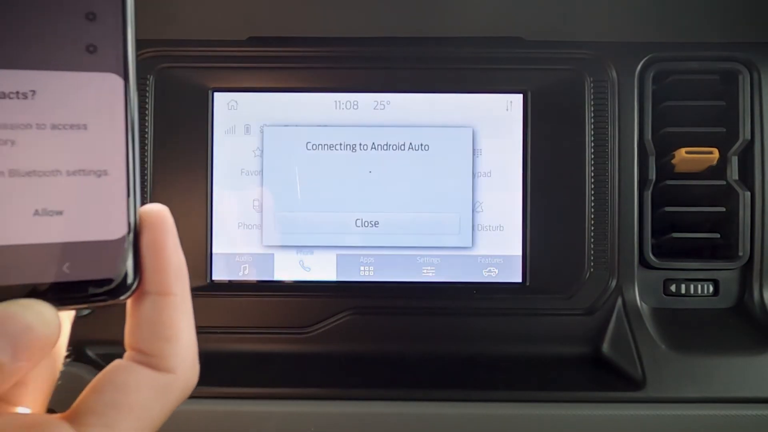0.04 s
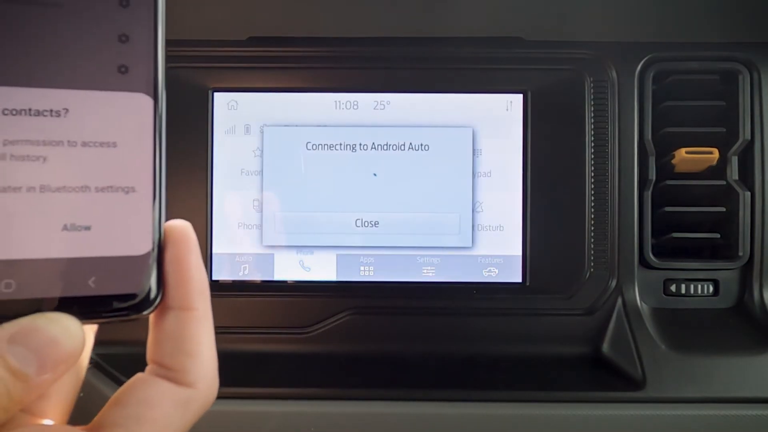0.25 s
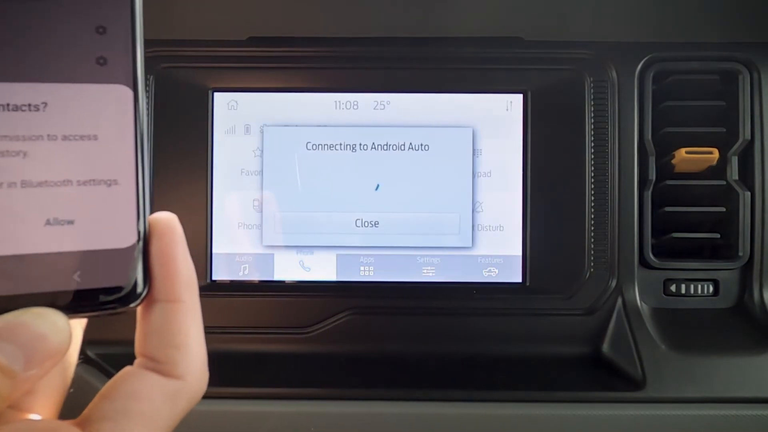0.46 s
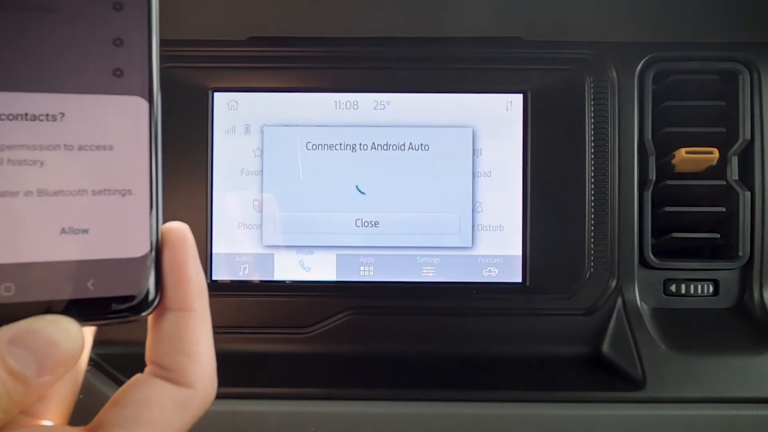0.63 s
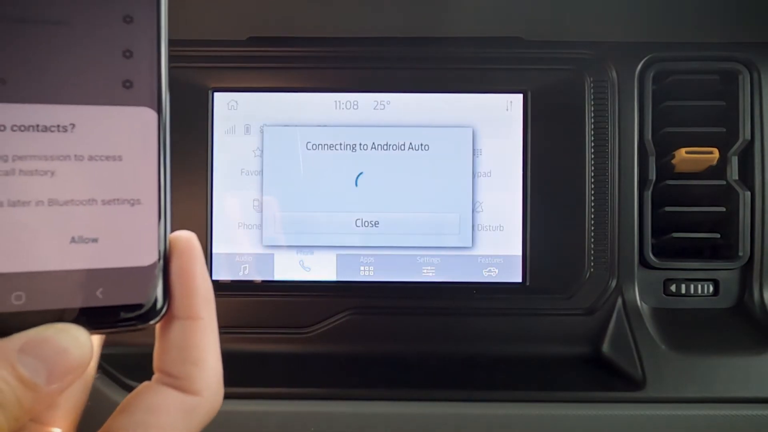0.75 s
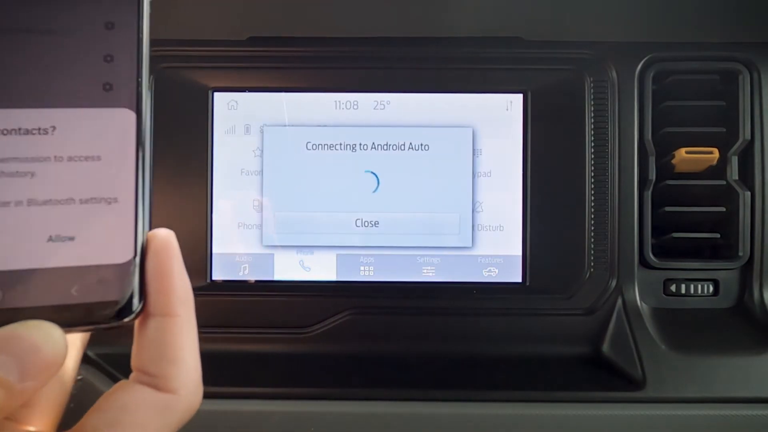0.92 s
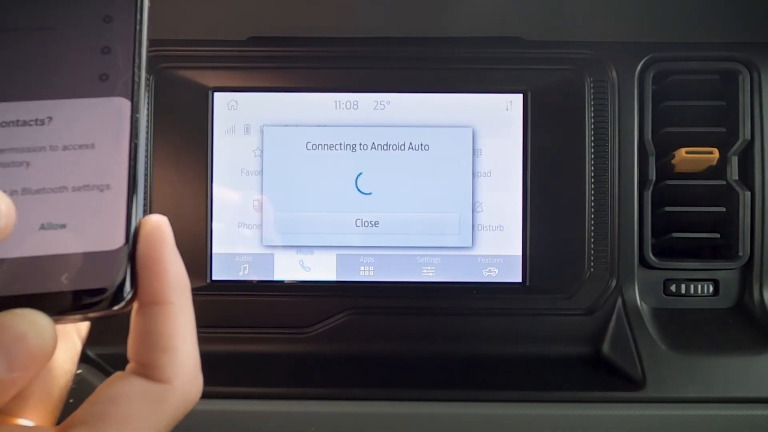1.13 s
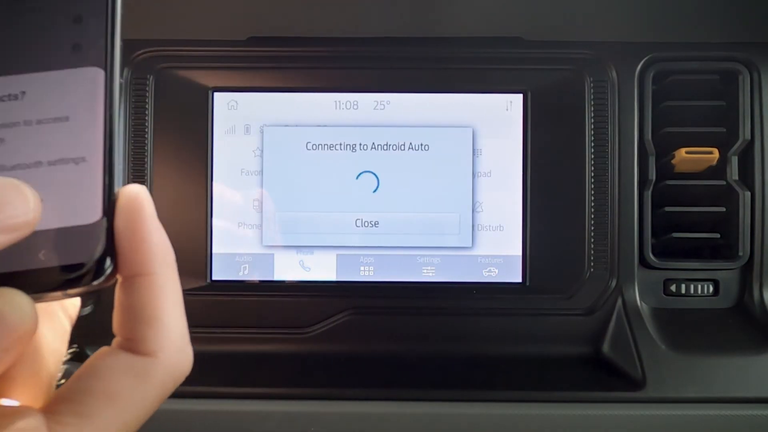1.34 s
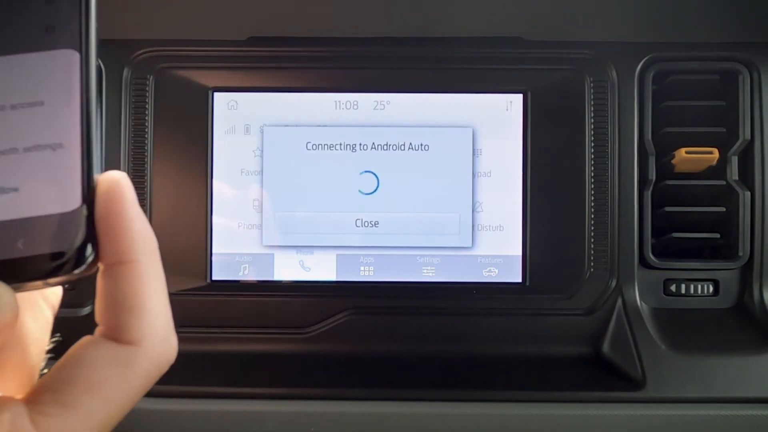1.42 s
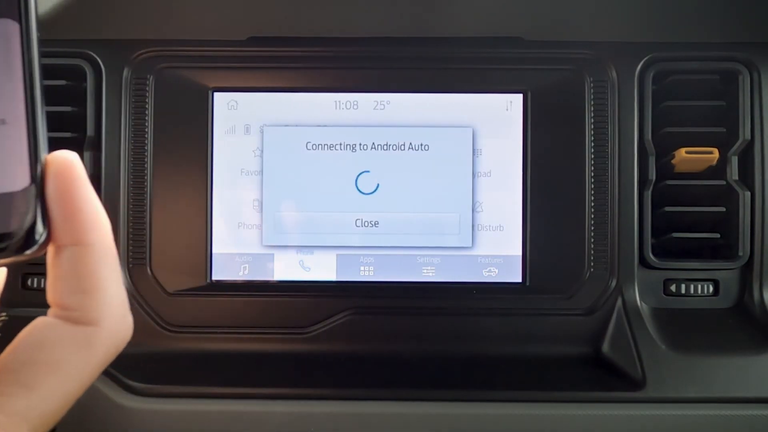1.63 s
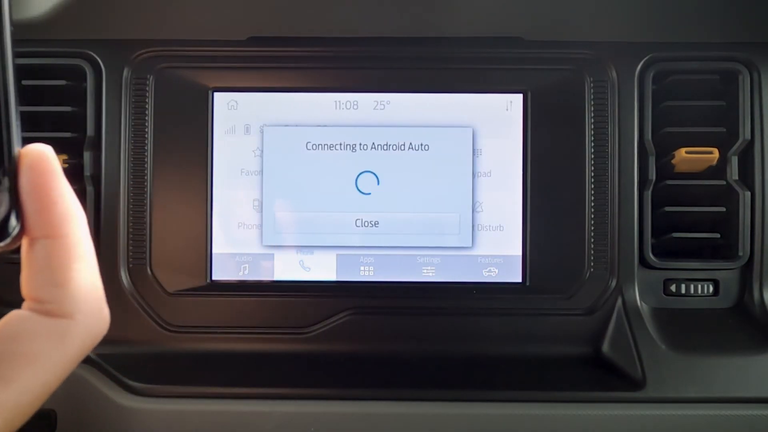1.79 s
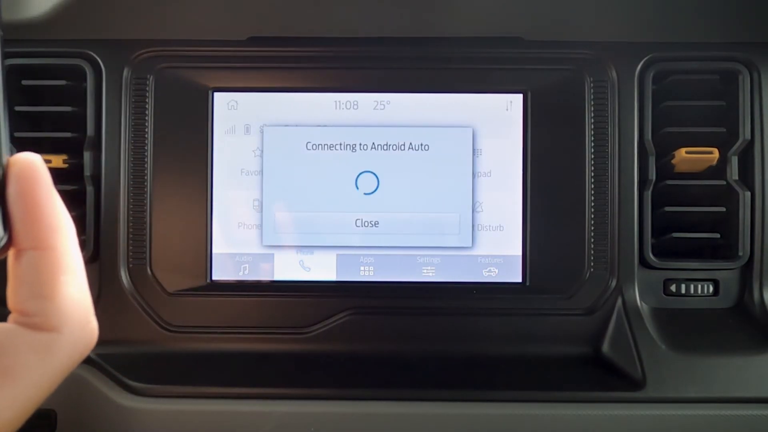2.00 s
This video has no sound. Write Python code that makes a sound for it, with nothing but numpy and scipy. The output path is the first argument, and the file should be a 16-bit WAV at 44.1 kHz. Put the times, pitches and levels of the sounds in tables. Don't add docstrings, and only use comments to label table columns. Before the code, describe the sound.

Low idling engine rumble heard inside a stationary car, with soft finger rubs on a phone case

```python
import sys
import numpy as np
from scipy import signal
from scipy.fft import rfft, irfft, next_fast_len
from scipy.io import wavfile

SR = 44100
rng = np.random.default_rng(int(sys.argv[2]) if len(sys.argv) > 2 else 0)


def transcribe(signal):
    frames = np.atleast_2d(signal).T
    limited = np.clip(frames, -1, 1)
    pcm = np.round(limited * 32767).astype(np.int16)
    wavfile.write(sys.argv[1], SR, pcm)


def voltage_ratio(decibels):
    exponent = np.asarray(decibels, float) / 20
    return 10 ** exponent


N = 90581
TIME_S = np.arange(N) / SR


def at_hz(points, hz):
    p = np.array(points, float)
    return np.interp(np.log(hz), np.log(p[:, 0]), p[:, 1])


def coloured(gain):
    size = next_fast_len(N)
    hz = np.arange(1, size // 2 + 2) * SR / size
    x = irfft(rfft(rng.standard_normal(size)) * gain(hz), size)[:N]
    return x / x.std()


def drift(rate_hz):
    return coloured(lambda hz: 1 / (1 + (hz / rate_hz) ** 2))


def shaped(points):
    low_hz, high_hz = points[0][0], points[-1][0]
    return coloured(lambda hz: voltage_ratio(at_hz(points, hz)) / (1 + (low_hz / hz) ** 8 + (hz / high_hz) ** 8))


def resonance(centre_hz, width_hz):
    return coloured(lambda hz: 1 / (1 + ((hz - centre_hz) / width_hz * 1.48) ** 2))


# (frequency [Hz], density [dB per Hz])
HISS_SPECTRUM = [(1800, -0.5), (2390, -3.5), (4000, -7.5), (5410, -10), (6480, -12), (11900, -15),
                 (15800, -9.5)]
HISS_DB = -65.5


def hiss():
    return voltage_ratio(HISS_DB) * shaped(HISS_SPECTRUM)


# (frequency [Hz], density [dB per Hz])
RUMBLE_SPECTRUM = [(9, -14), (21, 0), (44, 2), (62, -4), (72, -11), (85, -12.5), (100, -18), (140, -16)]
RUMBLE_DB = -38.3


def rumble():
    return voltage_ratio(RUMBLE_DB) * shaped(RUMBLE_SPECTRUM)


# (frequency [Hz], density [dB per Hz])
AIR_SPECTRUM = [(150, -7), (220, -14), (304, -15), (400, -6), (480, -16.5), (1080, -17.5), (1620, -28),
                (2600, -43)]
AIR_DB, AIR_DRIFT_DB = -52, 0.61


def duct_air():
    return voltage_ratio(AIR_DB + AIR_DRIFT_DB * drift(4.6)) * shaped(AIR_SPECTRUM)


# (frequency [Hz], width [Hz], level [dB rms])
PANEL_RESONANCES = [(166, 36, -55.5), (279.3, 37, -57), (344.7, 31.6, -52.5), (366.1, 13, -52),
                    (380.8, 15, -60), (406.2, 9.3, -55), (436.5, 12.5, -54.5), (459.4, 21, -61.5),
                    (559.5, 47, -61), (746, 68, -64.5), (1076, 70, -65.5), (1794, 54, -80),
                    (2375, 110, -79.5), (2790, 30, -83)]
PANEL_DRIFT_DB = .6


def panels():
    out = np.zeros(N)
    for hz, width_hz, db in PANEL_RESONANCES:
        out += voltage_ratio(db + PANEL_DRIFT_DB * drift(6.0)) * resonance(hz, width_hz)
    return out


# (time [s], firing rate [Hz])
FIRING_RATE = [(0, 28.97), (1.0, 28.96), (1.5, 29.08), (2.06, 29.25)]
STRONG_FIRING_S = .0528


def firing_angle():
    rate_hz = np.interp(TIME_S, *np.transpose(FIRING_RATE))
    angle = 2 * np.pi * np.cumsum(rate_hz) / SR
    return angle - angle[int(STRONG_FIRING_S * SR)]


# (time [s], level [dB])
CHIRP_HIGH_LEVEL = [(0, -66), (.45, -66), (.85, -69.5), (1.1, -74), (1.3, -80), (1.6, -75), (2.06, -75)]
# (time [s], level [dB])
CHIRP_LOW_LEVEL = [(0, -80), (.45, -77), (.9, -72), (1.5, -71), (2.06, -72)]
# main belt, second belt [Hz]
CHIRP_PITCH = (5700, 5130)
CHIRP_LAG_S, CHIRP_SHARPNESS, CHIRP_UNEVEN_DB = .004, 1.7, 1.6


def pulley(angle):
    a = angle - 2 * np.pi * FIRING_RATE[0][1] * CHIRP_LAG_S
    torque = .75 * np.cos(a) + .19 * np.cos(a / 2) - .06 * np.cos(a / 4)
    gate = np.exp(CHIRP_SHARPNESS * (torque - 1))
    out = np.zeros(N)
    for hz, levels in zip(CHIRP_PITCH, (CHIRP_HIGH_LEVEL, CHIRP_LOW_LEVEL)):
        pitch_hz = hz - 45 * np.sin(a) - 35 * np.cos(a / 2) + 35 * drift(80.0)
        level_db = np.interp(TIME_S, *np.transpose(levels)) + CHIRP_UNEVEN_DB * drift(20.0)
        out += voltage_ratio(level_db) * gate * np.sin(2 * np.pi * np.cumsum(pitch_hz) / SR)
    return out


# (time [s], frequency [Hz], peak level [dB], t60 [s])
KNOCK_MODES = [
    (0, 262, -28, .07),
    (1.334, 1300, -49, .04),
    (1.334, 1750, -51, .035),
    (1.338, 2730, -59, .07),
]
KNOCK_RISE_S = .002


def knocks():
    out = np.zeros(N)
    for start_s, hz, db, t60_s in KNOCK_MODES:
        age_s = TIME_S - start_s
        decay = voltage_ratio(db - 60 * np.abs(age_s) / t60_s)
        already_ringing = start_s == 0
        onset = np.minimum(1, already_ringing + np.abs(age_s) / KNOCK_RISE_S)
        out -= (age_s >= 0) * decay * onset * np.cos(2 * np.pi * hz * age_s)
    return out


# (time [s], level [dB], frequency [Hz], width [Hz], t60 [s])
TICK_MODES = [
    (.003, -54, 6960, 970, 0.055),
    (.003, -55, 9800, 3200, .03),
    (.001, -65, 2700, 1600, 0.11),
    (.004, -48, 945, 150, 0.2),
    (.004, -52, 1290, 150, 0.25),
    (.004, -60, 1860, 1100, 0.12),
]
TICK_RISE_S = 0.00058


def ticks():
    out = np.zeros(N)
    for start_s, db, hz, width_hz, t60_s in TICK_MODES:
        age_s = np.maximum(TIME_S - start_s, 0)
        onset = np.minimum(age_s / TICK_RISE_S, 1)
        out += voltage_ratio(db - 60 * age_s / t60_s) * onset * resonance(hz, width_hz)
    return out


# (time [s], level [dB], lowest frequency [Hz])
NAIL_CLICK = (1.909, -31, 9000)


def click():
    start_s, db, low_hz = NAIL_CLICK
    first = int(start_s * SR)
    out = np.zeros(N)
    out[first] = voltage_ratio(db)
    out[first + 60] = -voltage_ratio(db - 5)
    return signal.sosfilt(signal.butter(4, low_hz, "high", fs=SR, output="sos"), out)


# (start [s], length [s], level [dB], centre [Hz], width [Hz])
RUB_TRAIL = (1.025, .23, -62, 11900, 1100)


def trail():
    start_s, length_s, db, hz, width_hz = RUB_TRAIL
    u = np.clip((TIME_S - start_s) / length_s, 0, 1)
    return voltage_ratio(db) * np.sin(np.pi * u ** 0.67) ** 2 * resonance(hz, width_hz)


# (start [s], length [s], level [dB], centre [Hz], rising share [0-1])
GRIP_RUBS = [(0.444, 0.19, -66, 12500, 0.34), (0.562, 0.093, -63, 12000, 0.37),
             (0.673, 0.068, -58.5, 13500, 0.26), (0.684, 0.068, -56, 14900, .5),
             (0.77, 0.03, -63.5, 12500, .4), (0.73, 0.49, -67, 12700, 0.48), (1.022, .18, -55, 13100, .12),
             (1.12, 0.15, -70.5, 12000, .4), (1.428, 0.12, -63, 12600, 0.33),
             (1.533, 0.076, -69, 13000, .4), (1.605, .17, -55.5, 13700, .25),
             (1.70, 0.081, -58.5, 13300, 0.67), (1.761, .13, -50.5, 13100, 0.16),
             (1.84, 0.2, -66.5, 12900, 0.25), (1.949, 0.11, -62.5, 12400, 0.41),
             (0.566, 0.076, -66, 4360, 0.45), (1.623, 0.13, -72, 4000, 0.43),
             (1.78, 0.42, -66.5, 3760, 0.33)]
# (frequency [Hz], level below its top [dB])
RUB_SKIRT_SPECTRUM = [(2000, -15), (3800, -6.5), (5500, -13), (7000, -5), (8500, -11.5), (15000, -7)]
RUB_WIDTH_OCT, RUB_GRAIN_DB = .44, .7


def rub_noise(centre_hz):
    def gain(hz):
        band = np.exp(-(np.log2(hz / centre_hz) / RUB_WIDTH_OCT) ** 2)
        skirt = voltage_ratio(at_hz(RUB_SKIRT_SPECTRUM, hz)) * (hz > 1500)
        return band + skirt
    return coloured(gain)


def rubs():
    out = np.zeros(N)
    for start_s, length_s, db, centre_hz, rise in GRIP_RUBS:
        rise = np.clip(rise, .05, .95)
        u = (TIME_S - start_s) / length_s
        ramp = np.clip(np.minimum(u / rise, (1 - u) / (1 - rise)), 0, 1)
        out += voltage_ratio(db) * np.sin(np.pi / 2 * ramp) ** 1.2 * rub_noise(centre_hz)
    return out * voltage_ratio(RUB_GRAIN_DB * drift(60.0))


# (multiple of firing rate, level [dB rms], unsteadiness [dB])
ENGINE_ORDERS = [(.5, -39.5, 2.0), (1, -24.2, .3), (2, -38.6, 1.2), (3, -60, 2.0), (4, -47, .5),
                 (4.77, -60.5, 2.0), (8, -67, 1.5)]
# (time [s], level [dB rms])
IDLE_LOAD = [(0, -22), (.09, -26), (.3, -23), (.46, -23.5), (.54, -25), (.7, -23.2), (.88, -22.5),
             (.96, -24), (1.3, -24), (1.63, -23), (1.85, -24.5), (2.05, -28)]
STEEP_RISE_RAD, STEEP_POWER = 1.0, 1.43


def engine(angle):
    load_s, load_db = np.transpose(IDLE_LOAD)
    swing_db = np.interp(TIME_S, load_s, load_db - load_db.mean())
    out = np.zeros(N)
    for order, db, wobble_db in ENGINE_ORDERS:
        level_db = db + swing_db / max(order, 1) + wobble_db * drift(16.0)
        lead_rad = STEEP_RISE_RAD * max(order - 1, 0) ** STEEP_POWER
        out += np.sqrt(2) * voltage_ratio(level_db) * np.cos(order * angle + lead_rad)
    return out


def scene():
    angle = firing_angle()
    cabin = hiss() + rumble() + duct_air() + panels()
    hand = knocks() + ticks() + click() + trail() + rubs()
    return (cabin + pulley(angle) + hand + engine(angle))[None]


def roll_off(x):
    return signal.sosfilt(signal.butter(12, 16040, fs=SR, output="sos"), x)


def record(dry):
    top_cut = signal.ellip(12, .1, 40, 15660, fs=SR, output="sos")
    mix = signal.sosfiltfilt(top_cut, dry)
    return roll_off(mix)


dry = scene()
out = record(dry)
transcribe(out)
```